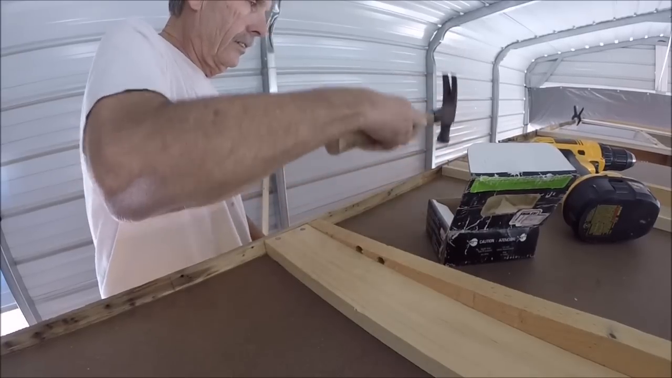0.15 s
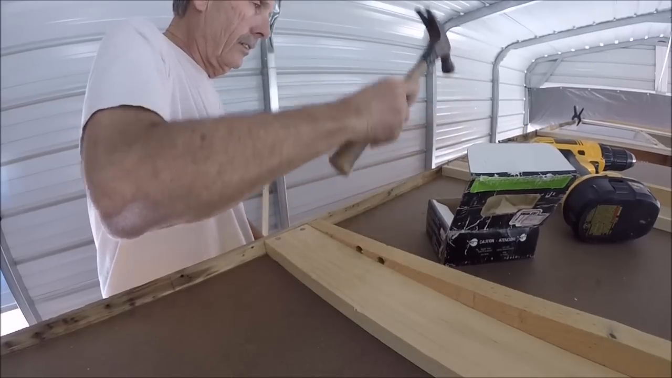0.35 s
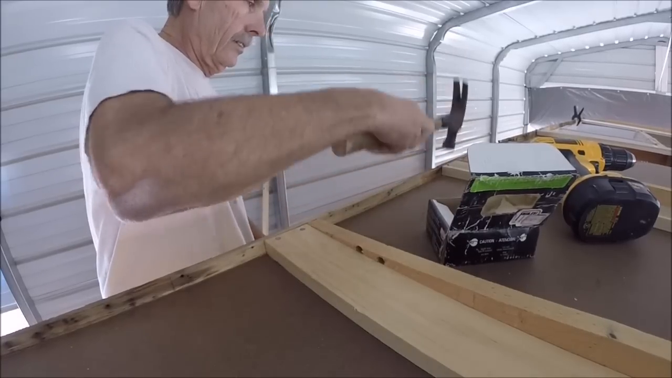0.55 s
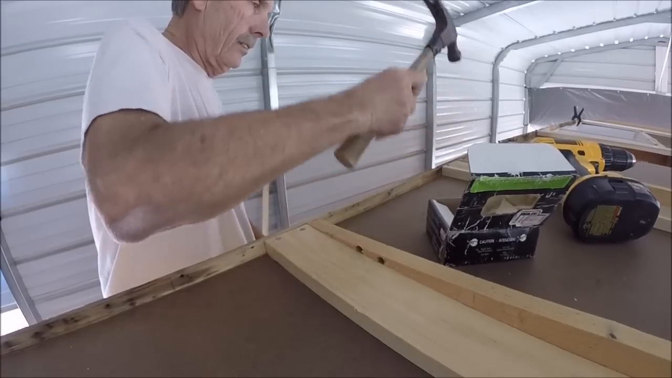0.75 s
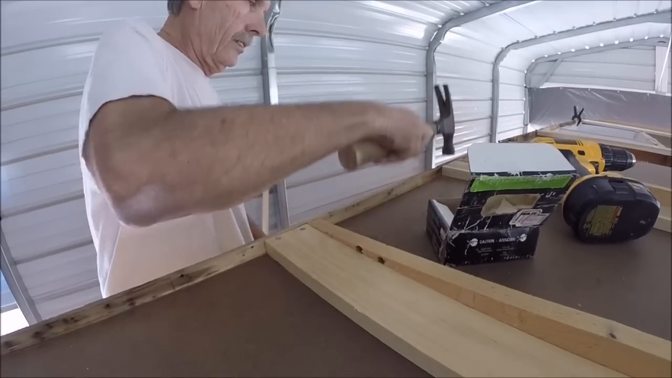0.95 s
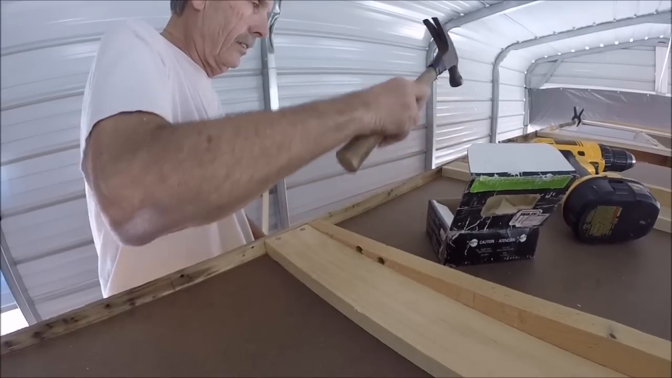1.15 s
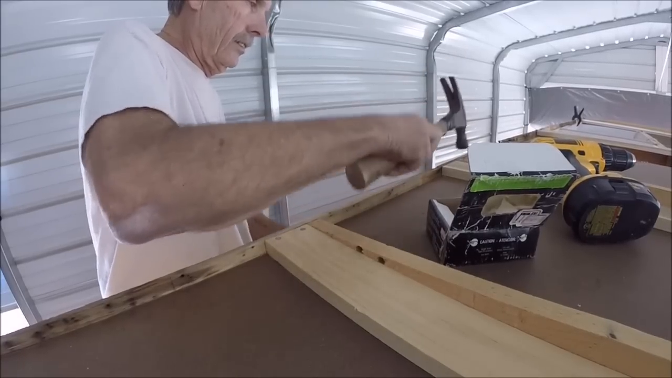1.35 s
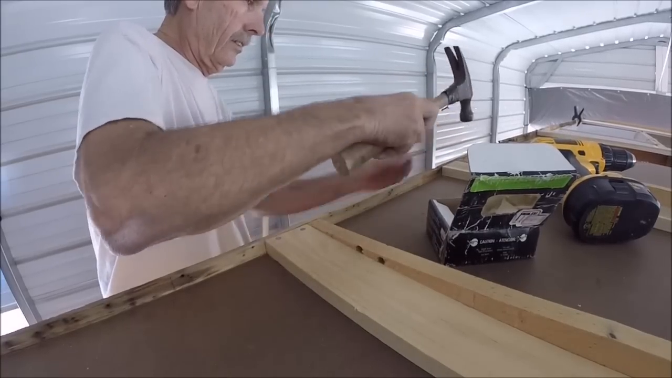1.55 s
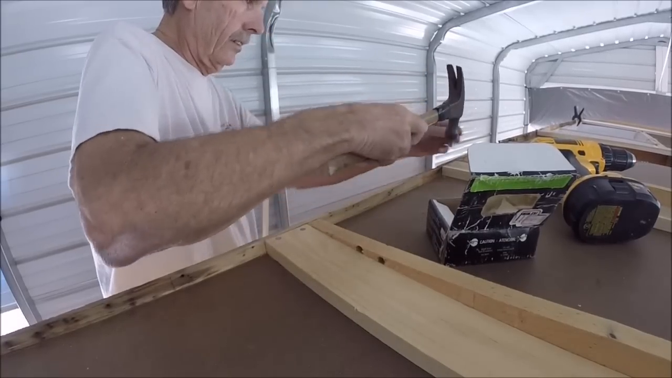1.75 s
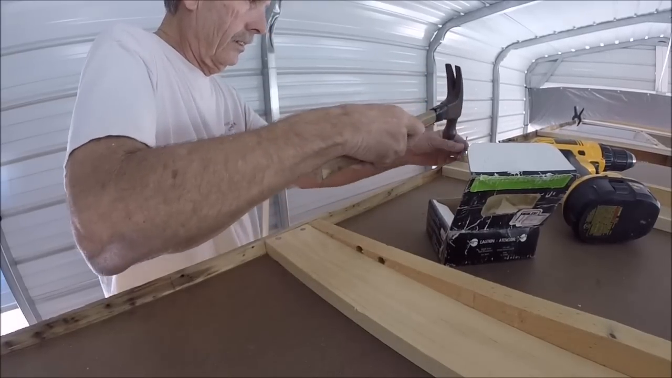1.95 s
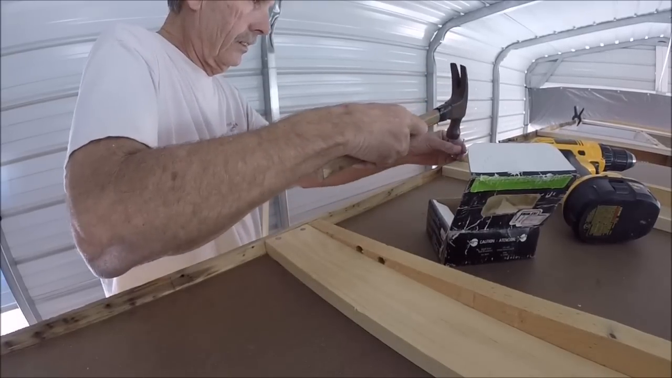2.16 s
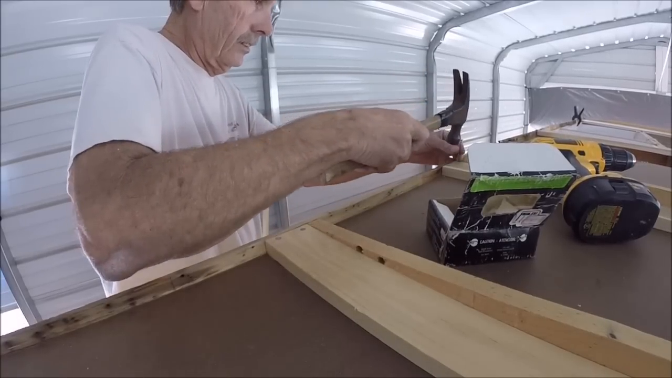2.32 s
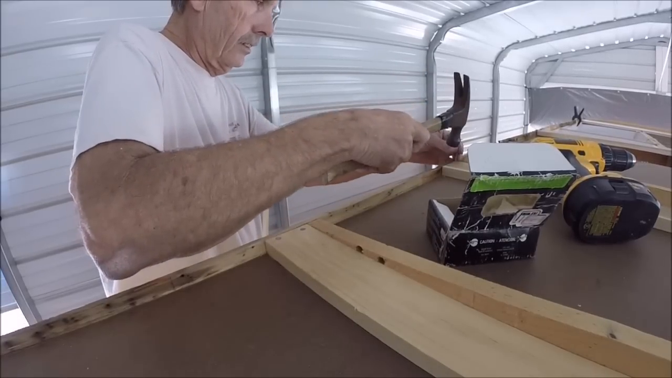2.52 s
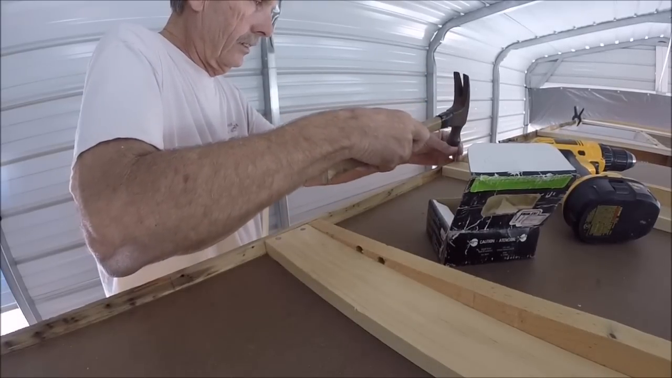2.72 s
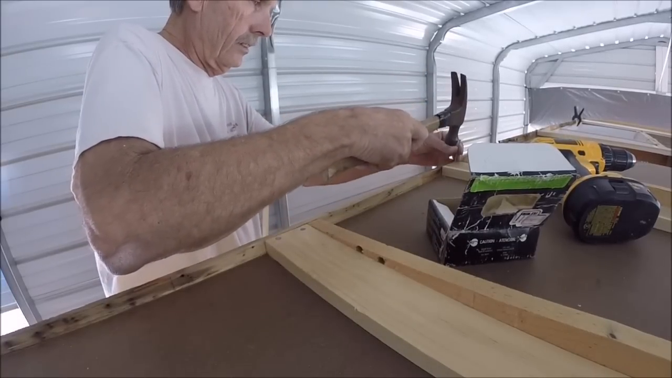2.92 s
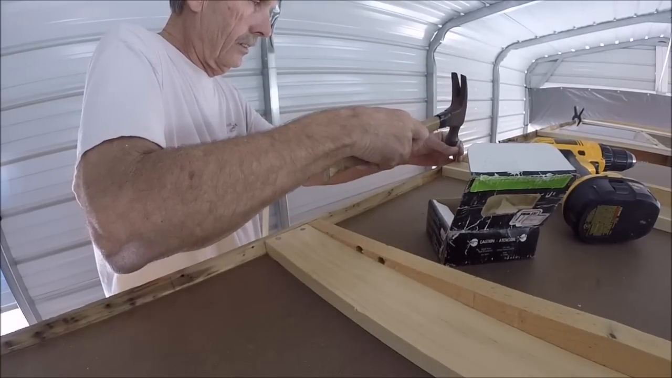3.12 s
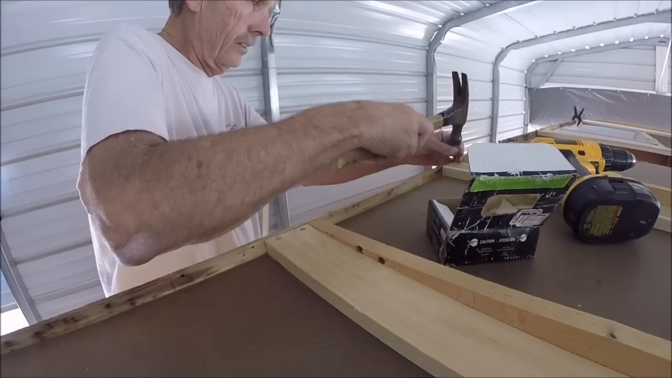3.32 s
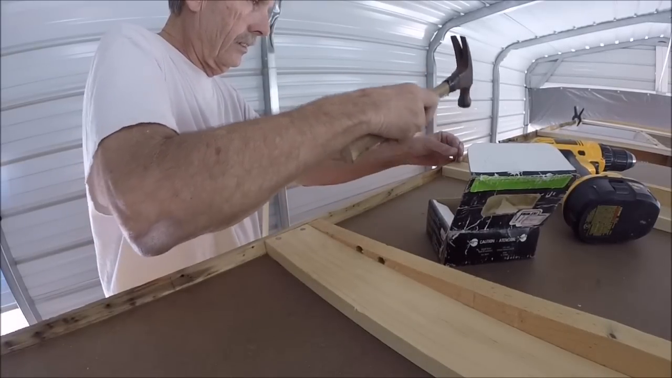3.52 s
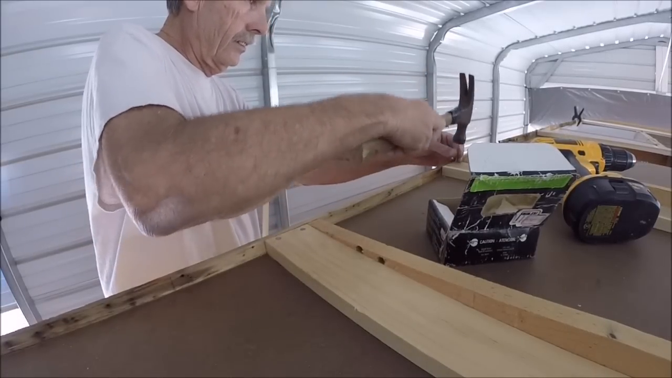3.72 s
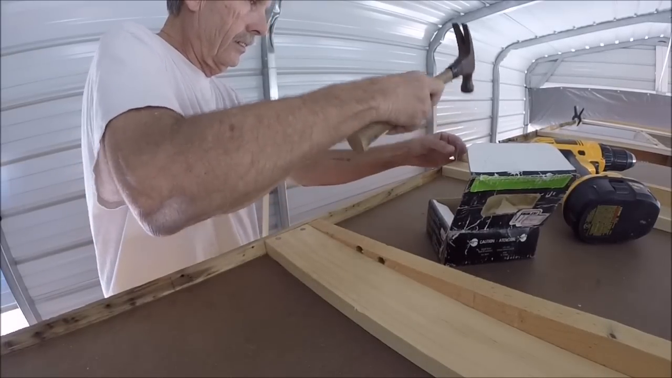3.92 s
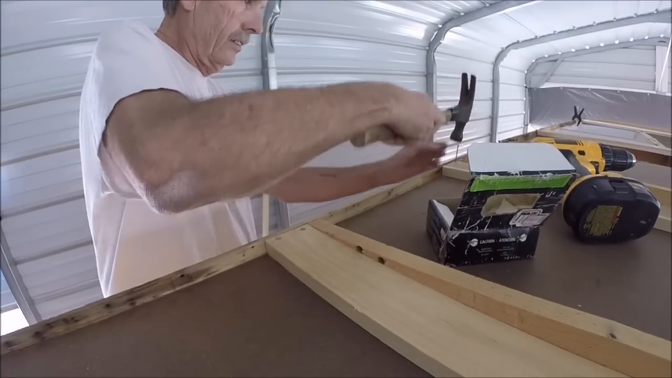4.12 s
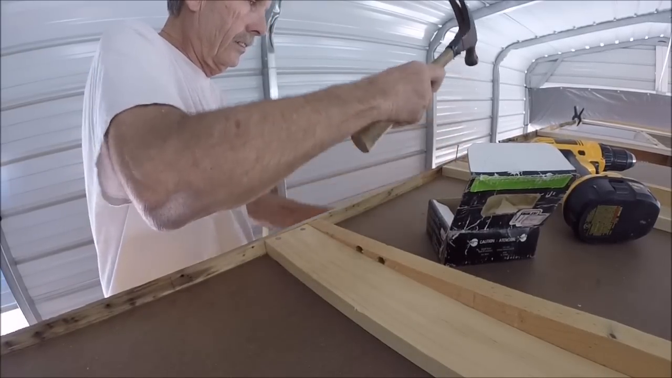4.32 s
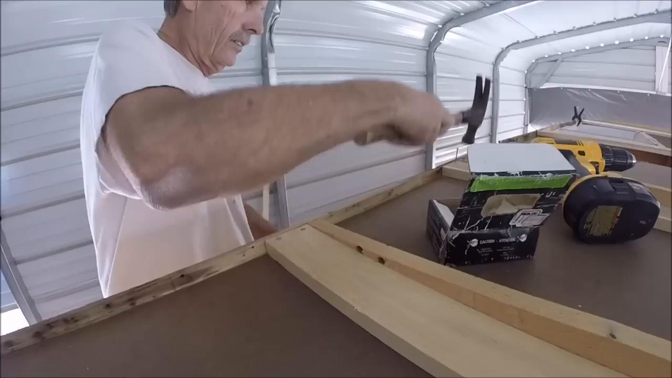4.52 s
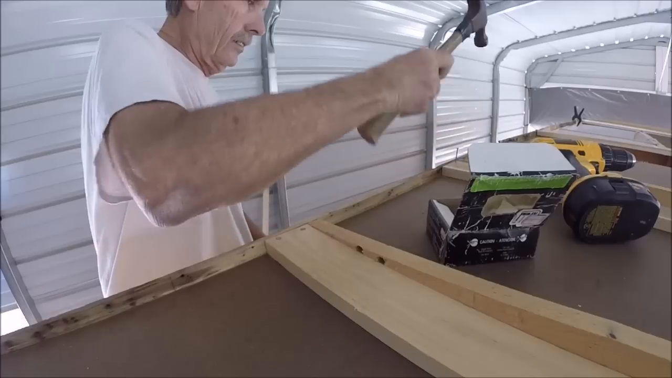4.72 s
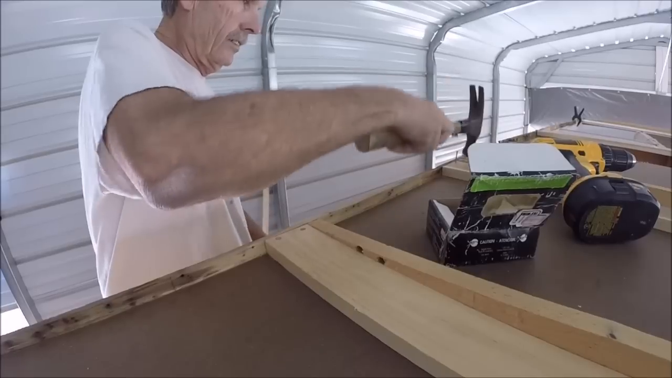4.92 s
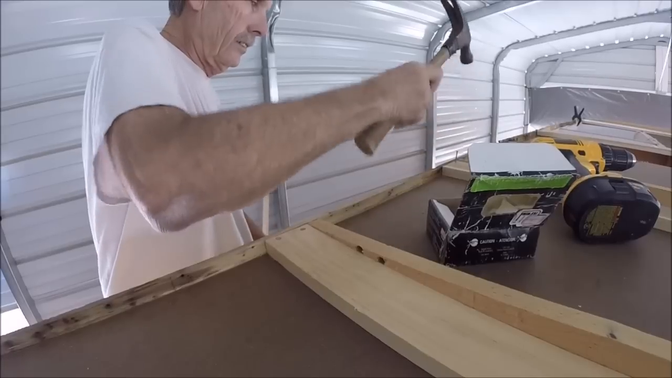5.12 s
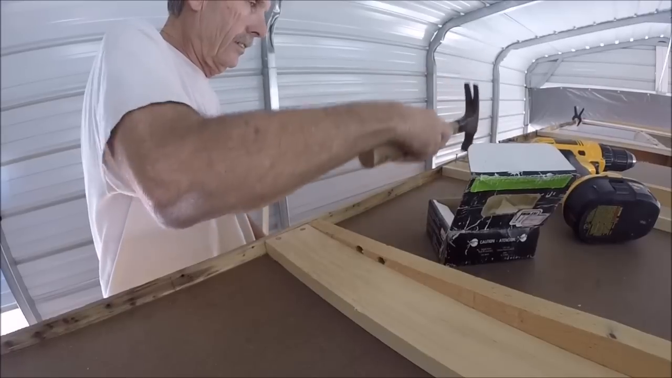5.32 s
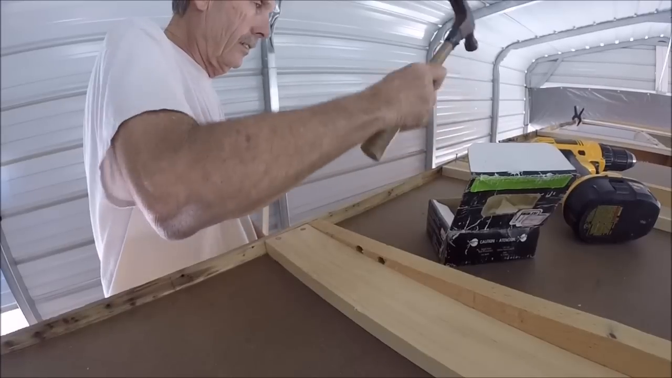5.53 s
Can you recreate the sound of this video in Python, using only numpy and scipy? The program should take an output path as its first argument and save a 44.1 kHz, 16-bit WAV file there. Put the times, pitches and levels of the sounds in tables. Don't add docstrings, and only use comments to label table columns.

```python
import sys
import numpy as np
from scipy import signal
from scipy.fft import rfft, irfft
from scipy.io import wavfile
from scipy.ndimage import uniform_filter1d

SR = 44100
rng = np.random.default_rng(int(sys.argv[2]) if len(sys.argv) > 2 else 0)


def level_to_linear(level):
    exponent = np.asarray(level, float) / 20
    return 10 ** exponent


def dump(signal):
    limited = np.clip(np.atleast_2d(signal).T, -1, 1)
    pcm = np.round(limited * 32767).astype(np.int16)
    wavfile.write(sys.argv[1], SR, pcm)


N = 245616
BLOW_T = np.arange(SR // 2) / SR

# (time [s], crack [dB], knock of the strip [dB], head
# landing on wood [dB], brightness [dB/octave])
HAMMER_BLOWS = [(0.1206, -8, -15.5, -19.5, -0.2), (0.5408, -5, -16.5, -17, -0.3),
                (0.9576, -7, -18.5, -9.5, -3.6), (1.0076, -16.5, -22, -25, -1.8),
                (1.3914, -4.5, -16.5, -4, -2.5), (3.7716, -16, -17.5, -31.5, 8.5),
                (3.8202, -17, -24, -21.5, -8.5), (4.1546, -8.5, -17.5, -53, 2),
                (4.5408, -7.5, -20, -33, 0.7), (4.9457, -6.5, -24.5, -27.5, 3.5),
                (5.3449, -6, -22.5, -35, 3)]


def evened(x):
    return x / np.sqrt(np.mean(x ** 2) + 1e-20)


def read(points, hz, order=1):
    columns = np.transpose(points)
    return np.interp(np.log(hz + 1), np.log(columns[0] + 1), columns[order])


def add(mix, s, sound):
    part = mix[round(s * SR):][:len(sound)]
    part += sound[:len(part)]


def attack(seconds):
    return np.clip(BLOW_T / seconds, 0, 1)


def random_phases(modes):
    return rng.uniform(0, 2 * np.pi, len(modes))


def ring(modes, t, phases):
    total = 0
    for (hz, db, t60), phase in zip(modes, phases):
        total = total + level_to_linear(db - 60 * t / t60) * np.sin(2 * np.pi * hz * t + phase)
    return total


def noise(points, patchy_db):
    frames, hz = N // 256 + 5, np.fft.rfftfreq(1024, 1 / SR)
    real, imag, patches = rng.standard_normal((frames, 513, 3)).T
    patches = uniform_filter1d(patches, size=10, axis=0)
    patches = evened(uniform_filter1d(patches, size=16, axis=1))
    level_db = read(points, hz)[:, None] + patchy_db * np.clip(patches, -2, 1.5)
    spectra = (real + 1j * imag) * level_to_linear(level_db)
    return evened(signal.istft(spectra, nperseg=1024, noverlap=768)[1][:N])


def ducking():
    start_db, full_db = 12, 13
    loud_db = -12
    share = 0.53
    duck_s, hold_s, recover_db_per_s = 0.15, 0.38, 19
    t = np.arange(N) / SR
    down_db = np.full(N, float(start_db))
    for s, crack_db, *_ in HAMMER_BLOWS:
        if crack_db > loud_db:
            before_db = down_db[round(s * SR)]
            step_db = share * (full_db - before_db) * np.clip((t - s) / duck_s, 0, 1)
            back_db = recover_db_per_s * np.maximum(t - s - hold_s, 0)
            ducked_db = np.maximum(before_db + step_db - back_db, 0)
            down_db = np.where(t < s, down_db, ducked_db)
    return uniform_filter1d(down_db, size=2000)


def outdoors():
    # (frequency [Hz], density [dB/Hz])
    traffic_spectrum = [(53, -35), (90, -11.5), (124, -3), (259, 1.5), (314, -6.5), (483, -6), (586, -10),
                        (1030, -5), (1360, -8.5), (3290, -12), (4640, -24.5), (5750, -26), (7950, -41.5),
                        (14500, -49), (15500, -48.5)]
    # (frequency [Hz], density [dB/Hz])
    rumble_spectrum = [(8.8, -27.5), (15, -5), (38, 7), (59, 1), (97, -10), (118, 1.5), (130, -4),
                       (170, -34), (290, -120)]
    level_db = -49.5 - ducking()
    rumble_db = -53.5 + 0.25 * (level_db + 50)
    rumble = level_to_linear(rumble_db) * noise(rumble_spectrum, patchy_db=5.0)
    return level_to_linear(level_db + 2.0) * noise(traffic_spectrum, patchy_db=1.6) + rumble


def crack_colour(tilt_db):
    # (frequency [Hz], density [dB/Hz])
    crack_spectrum = [(180, -30.5), (300, -13), (342, -6), (424, -9), (476, -6.5), (754, -3.5), (832, -1),
                      (1580, -2.5), (2230, -11), (3480, -9), (10800, -34), (15300, -41.5)]
    hz = np.fft.rfftfreq(len(BLOW_T), 1 / SR)
    treble_db = 1 - 0.95 * tilt_db
    slope_db = tilt_db * np.log2((hz + 50) / 2500) + treble_db * np.log2(1 + (hz / 7000) ** 2)
    return level_to_linear(read(crack_spectrum, hz) + slope_db)


def tint(x, colour):
    return irfft(rfft(x) * colour, len(BLOW_T)) / np.sqrt(np.mean(colour ** 2))


def steel_crack(crack_db, colour):
    burst = tint(rng.standard_normal(len(BLOW_T)), colour)
    return level_to_linear(crack_db + 1.5) * burst * attack(0.00028) * level_to_linear(-60 * BLOW_T / 0.0054)


def hammer_head(level_db):
    # (pitch [Hz], level [dB], t60 [s])
    head_modes = [(1544, -6.5, 0.0071), (5430, -6.5, 0.0091), (7730, -7, 0.0031), (11100, -20.5, 0.0083)]
    return level_to_linear(level_db) * ring(head_modes, BLOW_T, random_phases(head_modes)) * attack(0.00079)


def nail_ring(nail_hz, nail_db, t60):
    # (ratio to the nail's pitch, level [dB])
    close_modes = [(1.026, -12.5), (1.066, -6)]
    # (ratio to the nail's pitch, level [dB])
    shank_overtones = [(2.1, -19.5), (3.169, -22)]
    sag, sag_s = 0.09, 0.0045
    modes = [(nail_hz, 0, t60), (1757, -4.5, 0.007)]
    modes += [(nail_hz * ratio, db, t60 * 0.99) for ratio, db in close_modes]
    modes += [(nail_hz * ratio, db, 0.0048 + 0.35 * t60) for ratio, db in shank_overtones]
    bent_t = BLOW_T + sag * sag_s * (1 - np.exp(-BLOW_T / sag_s))
    return level_to_linear(nail_db) * ring(modes, bent_t, np.zeros(len(modes))) * attack(0.00094)


def strip_knock(knock_db, pitch, length, bright_db):
    # (pitch [Hz], level [dB], t60 [s])
    strip_modes = [(299, 2.5, 0.0088), (480, -4.5, 0.007), (707, -7.5, 0.016), (1036, -22.5, 0.004)]
    lowest_hz = strip_modes[0][0]
    modes = []
    for hz, db, t60 in strip_modes:
        modes.append((hz * pitch, db + bright_db * np.log2(hz / lowest_hz), t60 * length))
    knock = level_to_linear(knock_db + 3.0) * ring(modes, BLOW_T, np.zeros(len(modes)))
    return knock * (1 - np.exp(-BLOW_T / 0.0015))


def wood_thud(thud_db):
    thud_hz = 490 + 8.5 * thud_db
    delay_s = 0.00097 * level_to_linear(thud_db / 2)
    turns = np.maximum(BLOW_T - delay_s, 0) * thud_hz
    return level_to_linear(thud_db) * np.sin(2 * np.pi * turns) * np.exp(-((turns - 0.6) / 0.55) ** 2)


def walls():
    # (frequency [Hz], t60 [s], level [dB])
    wall_bands = [(60, 0.92, 1.5), (195, 0.34, 1), (499, 0.36, 1), (1160, 0.39, -6), (2900, 0.37, 0.5),
                  (5940, 0.36, -3.5), (9440, 0.28, -2.5), (12500, 0.26, 1), (15000, 0.1, -0.5)]
    size = len(BLOW_T)
    taps = rng.choice([-1., 1.], size) * (rng.random(size) < 0.3)
    hz, t, spectra = signal.stft(taps, SR, nperseg=256)
    decay_db = -60 * t / read(wall_bands, hz)[:, None]
    spectra = spectra * level_to_linear(read(wall_bands, hz, order=2)[:, None] + decay_db)
    tail = signal.istft(spectra, SR, nperseg=256)[1][:size] * attack(0.0017) ** 2
    return tail / np.linalg.norm(tail)


def through_walls(x):
    return signal.fftconvolve(x, walls())[:len(BLOW_T)]


def table_boom(boom_db):
    # (pitch [Hz], level [dB], t60 [s])
    table_modes = [(50.6, -11, 1), (80.5, 2, 0.38), (165.8, -2, 0.3), (248.4, -5, 0.3), (281.2, -1, 0.29),
                   (352, -8, 0.42), (495, 1, 0.21), (638, -24, 0.099), (650.4, 6.5, 0.11), (750, -4, 0.22),
                   (1028, -5, 0.25)]
    modes = []
    for hz, db, t60 in table_modes:
        detune, lift = rng.standard_normal(2)
        modes.append((hz * (1 + 0.0085 * detune), db + 3.1 * lift, t60))
    return level_to_linear(boom_db) * ring(modes, BLOW_T, random_phases(modes)) * (1 - np.exp(-BLOW_T / 0.011))


def blow(crack_db, knock_db, thud_db, tilt_db, nail, place, echoes):
    nail_hz, nail_db, nail_t60, head_db = nail
    pitch, length, bright_db, boom_db, wet_db = place
    colour = crack_colour(tilt_db)
    crack = steel_crack(crack_db, colour)
    crack_strength = np.linalg.norm(crack)
    crack = signal.lfilter(*signal.butter(2, 1490, "highpass", fs=SR), crack)
    head = hammer_head(crack_db + head_db)
    steel = nail_ring(nail_hz, nail_db, nail_t60)
    knock = strip_knock(knock_db, pitch, length, bright_db)
    sound = crack + knock + steel + wood_thud(thud_db) + head
    for s, db in echoes:
        add(sound, s, level_to_linear(db) * (crack + steel + 0.47 * head + 0.52 * knock))
    tail = level_to_linear(2.0) * crack_strength * tint(walls(), colour) * attack(0.00076)
    tail += level_to_linear(2) * through_walls(knock)
    tail += level_to_linear(0.5) * through_walls(steel + 0.33 * head)
    wet_db = wet_db - 0.18 * (crack_db + 9)
    boom = table_boom(knock_db + boom_db - 8)
    fade = np.clip((BLOW_T[-1] - BLOW_T) * 10, 0, 1) ** 2
    return (sound + level_to_linear(wet_db) * tail + boom) * fade


def scene():
    # (main ring pitch [Hz], mostly the free shank's, level [dB], t60 [s], head ring
    # over the crack [dB])
    nail_states = [(1550, -22.5, 0.0066, 3.1), (1480, -28, .012, -6), (1510, -27, 0.026, 2.5),
                   (5500, -40, .006, -16), (3470, -43, 0.011, -12), (5330, -24.5, 0.0043, 7.5),
                   (1820, -39, .015, -8), (2770, -17, 0.011, 2), (3551, -18.5, 0.12, 2),
                   (4405, -10.5, 0.014, -2), (3130, -18, 0.014, 4)]
    # (strip pitch factor, t60 factor, upper modes [dB/octave],
    # table boom over the knock [dB], walls [dB])
    nail_places = [
        (1.023, 1.75, 1.5, -8, 0.1),
        (0.969, 2.53, -2.4, -3.5, -0.63),
    ]
    # (time [s], level [dB])
    first_echoes = [
        [(.0016, -26.5), (.0045, -8), (.008, -11)],
        [(.0027, -11.5), (.007, -4), (.0118, -33)],
    ]
    mix = outdoors()
    for (s, *levels), nail in zip(HAMMER_BLOWS, nail_states):
        which = int(s > 2)
        add(mix, s, blow(*levels, nail, nail_places[which], first_echoes[which]))
    return mix[None]


def low_pass(x):
    return signal.sosfilt(signal.butter(12, 16530, fs=SR, output="sos"), x)


def record(dry):
    # (frequency [Hz], width [Hz], level [dB])
    port_resonance = (6240, 1850, 4.76)
    # (bass cut [Hz], band limit [Hz])
    band_edges = (30, 15700)
    hz, width, db = port_resonance
    b, a = signal.iirpeak(hz, hz / width, SR)
    x = dry + (level_to_linear(db) - 1) * signal.lfilter(b, a, dry)
    x = signal.sosfilt(signal.butter(2, band_edges[0], "highpass", fs=SR, output="sos"), x)
    x = x / (1 + abs(x / 0.5) ** 6) ** (1 / 6)
    x = signal.sosfilt(signal.cheby2(8, 35, band_edges[1], fs=SR, output="sos"), x)
    return low_pass(x)


dry = scene()
out = record(dry)
dump(out)
```